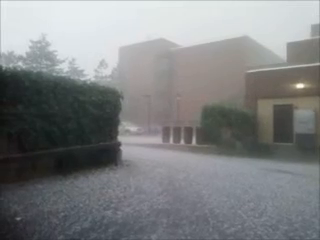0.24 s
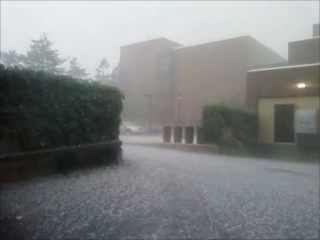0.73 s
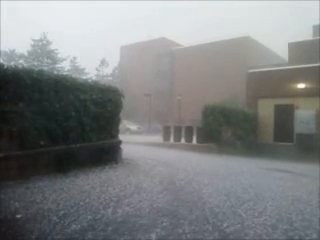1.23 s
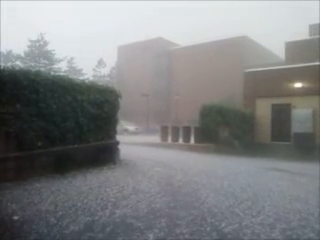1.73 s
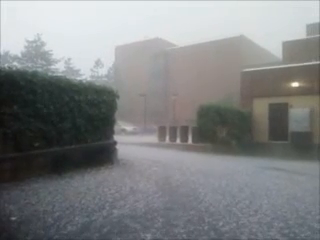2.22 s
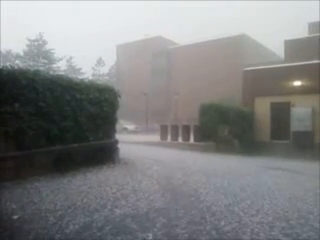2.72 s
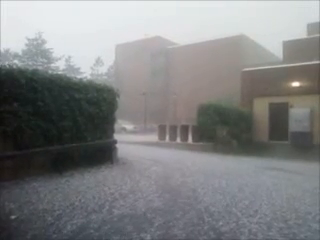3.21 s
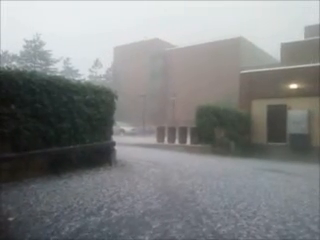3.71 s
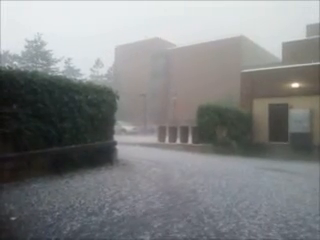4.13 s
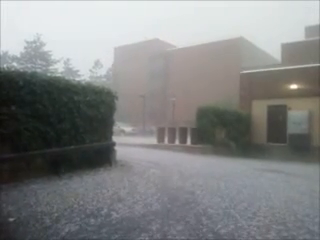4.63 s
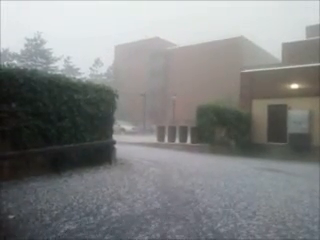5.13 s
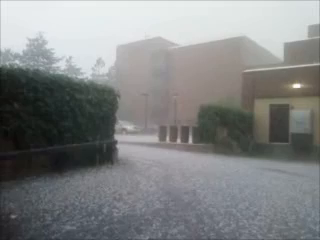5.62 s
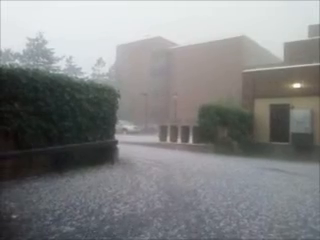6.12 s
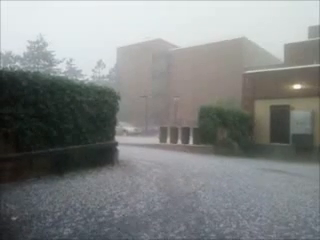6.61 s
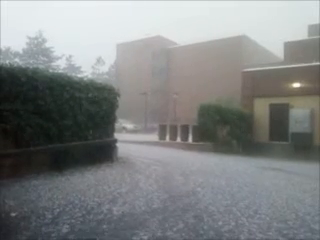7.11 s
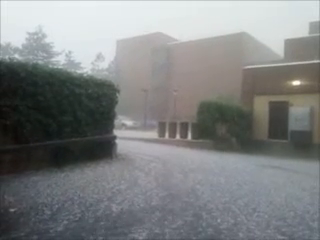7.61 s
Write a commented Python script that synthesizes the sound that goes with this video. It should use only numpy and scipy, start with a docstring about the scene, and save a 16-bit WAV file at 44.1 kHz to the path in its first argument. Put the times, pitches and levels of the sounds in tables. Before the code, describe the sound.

Heavy hail beats on a paved yard for about eight seconds, already at full strength when the sound begins. Thousands of small, hard impacts merge into a dense, ticking hiss. Beneath it are a duller wet splatter and a faint, uneven storm rumble, both swelling and easing gently. Brief flurries lift the hiss around 0.7, 2.2, 4.5, 4.7, 6.1 and 6.8 seconds, with a smaller one near the end. Small clumps of stones clatter near 2.2 and 2.8 seconds and again between 4.9 and 5.6 seconds. Sharp, bright ticks stand out irregularly all the way through, several each second, bunching in the flurries and strongest near 2.2 and 7.8 seconds. The overall level stays nearly constant. The sound is mono and narrow, with little bass or high treble, as through a small microphone that overloads for an instant on the loudest peaks.

```python
"""Heavy hail on a paved yard

Thousands of stones merge into a ticking hiss over wet splatter and a faint storm rumble, all heard
through a small, narrow-band microphone. Brief flurries lift the hiss and bring more and taller crests.
The tallest crests of the din overload the recorder, and each clips with a bright tick."""
import sys
import numpy as np
from scipy import signal
from scipy.fft import rfft, irfft
from scipy.io import wavfile
from scipy.ndimage import uniform_filter1d

SR = 44100
rng = np.random.default_rng(int(sys.argv[2]) if len(sys.argv) > 2 else 0)


def put_to_file(sound):
    """Save the sound as 16-bit audio at rate SR, in the file named by the first command-line argument."""
    columns = np.atleast_2d(sound).T  # one column per channel
    safe = np.clip(columns, -1, 1)
    whole_steps = np.round(safe * 32767)
    wavfile.write(sys.argv[1], SR, whole_steps.astype(np.int16))


N = 347461
T = np.arange(N) / SR
HZ = np.fft.rfftfreq(N, 1 / SR)

# Tone of the whole downpour at the microphone. Each row: frequency in Hz, relative level in dB.
DOWNPOUR_EQ = [(20, -33.5), (150, -28.5), (250, -27), (480, -22.5), (750, -14), (1250, -7), (1850, -10.5),
               (2400, -6), (2780, -1.5), (3300, -5.5), (3500, -11), (3750, -23), (4300, -39.5),
               (4650, -46.5)]
# Clumps of stones clattering on one surface.
# Each row: centre in seconds, pitch in Hz, boost in dB, half length in seconds.
CLUMP_CLATTERS = [(2.191, 2666, 9.5, 0.028), (2.202, 1300, 3.5, 0.042), (2.813, 1218, 9.5, 0.022),
                  (4.894, 1482, 8.5, .022), (4.996, 1312, 5.5, 0.013), (5.269, 957, 7.5, 0.028),
                  (5.473, 1200, 4.5, .028), (5.564, 1060, 8, .016), (6.83, 3154, 1.5, 0.02)]
# Steady hiss of the pavement between flurries. Each row: time in seconds, level in dB.
HISS_FADER = [(0.0, -15.5), (2.0, -15.5), (3.3, -15.5), (5.5, -16), (6.3, -15.6), (7.88, -15.5)]
# Flurries on the pavement nearby. Each row: centre in seconds, boost in dB, half length in seconds.
NEAR_FLURRIES = [(0.179, 2, 0.021), (0.697, 2.5, 0.06), (0.88, 1.7, 0.056), (1.25, 2, 0.035),
                 (1.458, 1.5, 0.098), (2.19, 4, 0.028), (2.403, 2.5, 0.016), (2.69, 1, 0.044),
                 (2.886, 1, 0.018), (3.17, 2, 0.041), (3.74, 1.14, 0.05), (4.067, 3, 0.012),
                 (4.514, 3.5, 0.034), (4.707, 3, 0.04), (4.85, 1, 0.027), (5.049, 3, 0.013),
                 (5.3, 1.5, 0.06), (6.062, 4.5, 0.014), (6.645, 3, 0.023), (6.836, 4, 0.029),
                 (7.82, 2, 0.063)]
# Slow swell of the wider yard. Each row: time in seconds, splatter level in dB, rumble level in dB.
YARD_FADERS = [(0.0, -20.5, -42.5), (0.75, -19.5, -40.5), (1.4, -21.9, -40.5), (1.75, -20.5, -42),
               (2.45, -19, -40), (2.7, -22, -40), (3.25, -20.5, -43.5), (3.6, -22.5, -40.5),
               (4.1, -21, -41), (4.75, -22.5, -44.0), (5.2, -20.5, -43), (5.5, -18.5, -39.5),
               (5.8, -21, -43.5), (6.4, -20.5, -41.5), (7.0, -23, -42.5), (7.4, -20.5, -42),
               (7.88, -23.5, -44)]
# The tallest crests of the hail's din, which overload the recorder and tick brightly.
# Each row: time in seconds, peak in dB before clipping.
CLIPPED_CRESTS = [(0.172, -2.5), (0.596, -1.5), (0.628, -0.8), (0.669, -1.9), (0.701, -3), (0.797, -0.3),
                  (0.932, -0.8), (1.143, -1.3), (1.241, -0.9), (1.322, -2.0), (1.388, -2.0), (1.512, -0.7),
                  (1.658, -2), (1.898, -1.1), (2.051, -0.4), (2.171, 0.6), (2.189, 1.5), (2.199, -2),
                  (2.213, 0), (2.397, -0.4), (2.545, 0.1), (2.827, -1.3), (2.892, -2), (3.174, -1.5),
                  (3.697, -0.9), (4.074, -1.9), (4.5, -1.3), (4.547, -0.3), (4.586, -1.5), (4.651, -1.5),
                  (4.744, -1.5), (4.864, -0.6), (5.081, -1), (5.251, -1.5), (5.349, -2), (6.07, -1.2),
                  (6.293, -2), (6.546, -2.2), (6.659, -0.5), (6.826, 0.5), (7.531, -2), (7.825, 0),
                  (7.839, 1.0)]

RUMBLE_TOP_HZ, SPLATTER_TOP_HZ, MIC_TOP_HZ = 546, 2148, 4500


def amp(db):
    """Decibels to gain."""
    return 10 ** (np.asarray(db) / 20)


def unit_rms(x):
    """Scales to rms 1."""
    return x / np.sqrt(np.mean(x ** 2) + 1e-20)


def fader_db(rows, column):
    """Rides a level in straight lines through one column of a table."""
    rows = np.asarray(rows)
    return np.interp(T, rows[:, 0], rows[:, column])


def below(edge_hz, steepness=12):
    """Share of the power that a steep low-pass lets through."""
    return 1 / (1 + (HZ / edge_hz) ** steepness)


def coloured(x, band):
    """Gives x the tone of the downpour within one band, at rms 1."""
    hz, db = np.transpose(DOWNPOUR_EQ)
    eq = amp(np.interp(np.log(HZ + 1), np.log(hz), db))
    return unit_rms(irfft(rfft(x) * eq * np.sqrt(np.maximum(band, 0)), N))


def impacts(per_s, spread_db, far_db):
    """Randomly timed impacts, mostly small, over the smooth wash of countless far ones."""
    size = amp(spread_db * np.minimum(rng.exponential(1, N), 4))
    near = size * rng.choice([-1, 1], N) * (rng.random(N) < per_s / SR)
    return unit_rms(near) + amp(far_db) * rng.standard_normal(N)


def clumped(x, patchy_db, flutter_db, patch_bins):
    """Stones land in clumps: brief patches of ringing colour, a flutter across all pitches, clatters."""
    hz, t, spectrum = signal.stft(x, SR, nperseg=1024, noverlap=768)
    patches = uniform_filter1d(rng.standard_normal(spectrum.shape), size=patch_bins, axis=0)
    patches = uniform_filter1d(patches, size=6, axis=1)
    flutter = uniform_filter1d(rng.standard_normal(len(t)), size=6)
    gain_db = patchy_db * unit_rms(patches) + flutter_db * unit_rms(flutter)
    for centre, pitch_hz, boost_db, half_s in CLUMP_CLATTERS:
        across_pitch = np.exp(-.5 * ((hz[:, None] - pitch_hz) / 150) ** 2)
        gain_db += boost_db * across_pitch * np.exp(-.5 * ((t - centre) / half_s) ** 2)
    return signal.istft(spectrum * amp(gain_db), SR, nperseg=1024, noverlap=768)[1][:N]


def flurry_db():
    """How far the flurries lift the hiss; each swells and fades as a bell curve."""
    return sum(boost_db * np.exp(-.5 * ((T - centre) / half_s) ** 2)
               for centre, boost_db, half_s in NEAR_FLURRIES)


def pavement_hiss():
    """The top layer: hard ticks of ice on paving, dense enough to hiss."""
    ticks = impacts(per_s=1800, spread_db=2.5, far_db=3.5)
    ticks = clumped(ticks, patchy_db=2.5, flutter_db=0.5, patch_bins=4)
    band = (1 - below(SPLATTER_TOP_HZ)) * below(MIC_TOP_HZ, steepness=80)
    return amp(fader_db(HISS_FADER, column=1) + flurry_db()) * coloured(ticks, band)


def yard_splatter():
    """The mids: duller, wetter blows on slush, hedge and roofs."""
    splats = impacts(per_s=900, spread_db=0.5, far_db=1.5)
    splats = clumped(splats, patchy_db=3.0, flutter_db=0.84, patch_bins=5)
    band = below(SPLATTER_TOP_HZ) - below(RUMBLE_TOP_HZ)
    return amp(fader_db(YARD_FADERS, column=1)) * coloured(splats, band)


def storm_rumble():
    """The low end: the lumpy roar of the storm."""
    roar = clumped(rng.standard_normal(N), patchy_db=2.5, flutter_db=2.27, patch_bins=5)
    return amp(fader_db(YARD_FADERS, column=2)) * coloured(roar, below(RUMBLE_TOP_HZ))


def limiter(bed, ceiling, passes):
    """Shaves the crests of the dense bed, within its own band, to hold it back from clipping."""
    band = below(3500, steepness=40) - below(900, steepness=20)
    for _ in range(passes):
        envelope = abs(signal.hilbert(bed)) + 1e-9
        excess = bed * np.maximum(1 - ceiling / envelope, 0)
        bed = bed - irfft(rfft(excess) * band, N)
    return bed


def crest_lifts(bed, crests, ping_hz, min_width_s):
    """Chance peaks in the din: a ping of a few cycles lifts a crest of the bed to each given peak."""
    analytic, pings = signal.hilbert(bed), np.zeros(N)
    for (time, peak_db), (detune, stretch) in zip(crests, rng.random((len(crests), 2))):
        nearby = np.clip(round(time * SR), 260, N - 260) + np.arange(-60, 60)
        crest = nearby[np.argmax(abs(analytic[nearby]))]
        span = crest + np.arange(-200, 200)
        t = T[span] - T[crest]
        lift = max(amp(peak_db) - abs(analytic[crest]), 0)
        envelope = np.exp(-.5 * (t / (min_width_s * (1 + stretch))) ** 2)
        pitch_hz = ping_hz * (1 + 0.18 * (detune - .5))
        phase = 2 * np.pi * pitch_hz * t + np.angle(analytic[crest])  # in step with the bed
        ping = lift * envelope * np.exp(1j * phase)
        analytic[span] += ping  # an overlapping ping rides on this one
        pings[span] += ping.real
    return pings


def trailing_crests(gap_s, drop_db):
    """A lower crest closely follows each of the tallest. Each row: time in seconds, peak in dB."""
    return [(time + rng.uniform(*gap_s), peak_db - rng.uniform(*drop_db))
            for time, peak_db in CLIPPED_CRESTS]


def stray_crests(lull_per_s, lull_peak_db):
    """Lesser crests at random, denser and taller in flurries. Each row: time in seconds, peak in dB."""
    surge_db = flurry_db()
    occurs = rng.random(N) < (lull_per_s + 12 * surge_db) / SR
    peak_db = rng.uniform(*lull_peak_db, N) + 0.34 * surge_db
    return list(zip(T[occurs], peak_db[occurs]))


def scene():
    """A mono bed of hiss, splatter and rumble, with tall crests poking out of it."""
    bed = limiter(pavement_hiss() + yard_splatter() + storm_rumble(), ceiling=.655, passes=4)
    crests = list(CLIPPED_CRESTS) + trailing_crests(gap_s=(.004, .028), drop_db=(.5, 1.5))
    crests += stray_crests(lull_per_s=.5, lull_peak_db=(-2.9, -2.1))
    return (bed + crest_lifts(bed, crests, ping_hz=2750, min_width_s=0.00036))[None]


def record(dry):
    """The recorder clips the tallest crests flat, throwing out short treble ticks; a high cut follows."""
    clip_level, high_cut_hz = .71, 15900
    clipped = np.clip(dry, -clip_level, clip_level)
    high_cut = signal.firwin(511, high_cut_hz, window=("kaiser", 9), fs=SR)
    return signal.oaconvolve(clipped, high_cut[None], "same")


dry = scene()
out = record(dry)
put_to_file(out)
```